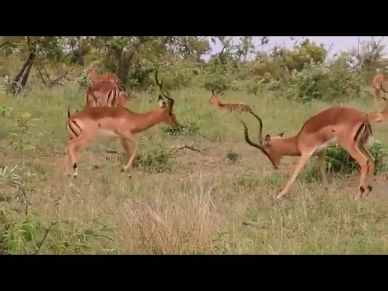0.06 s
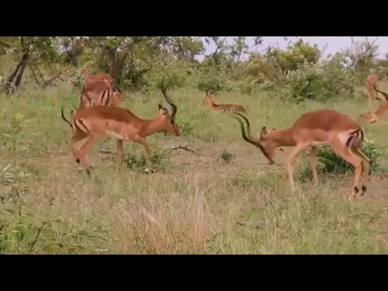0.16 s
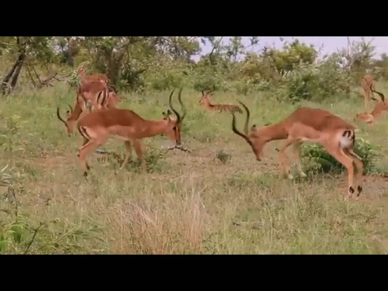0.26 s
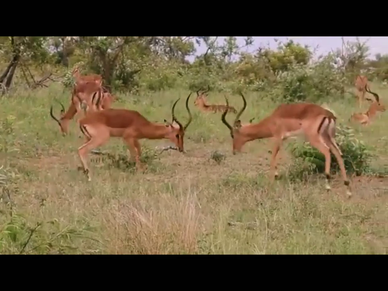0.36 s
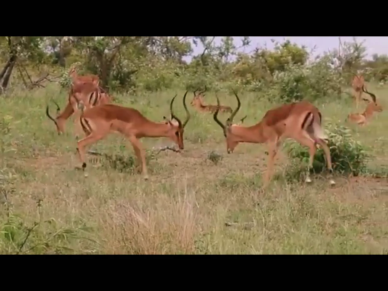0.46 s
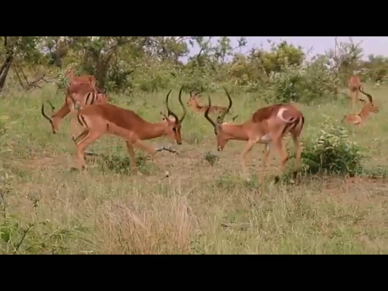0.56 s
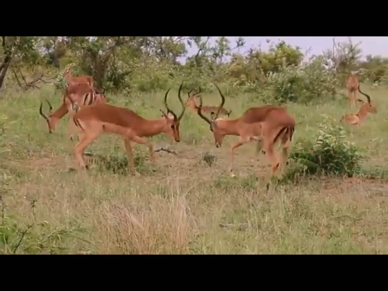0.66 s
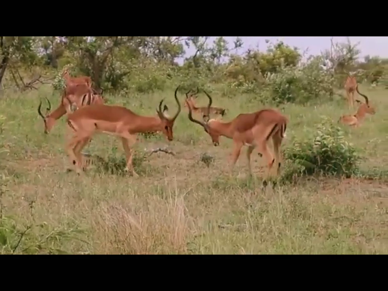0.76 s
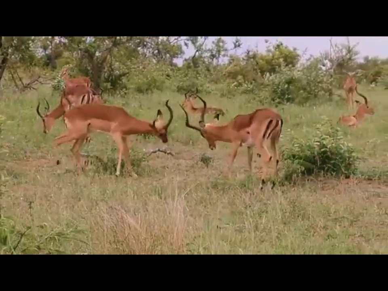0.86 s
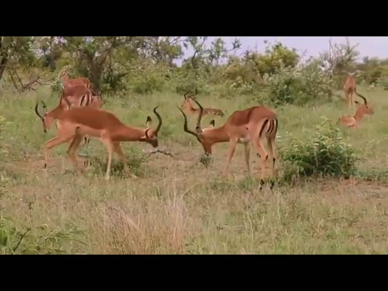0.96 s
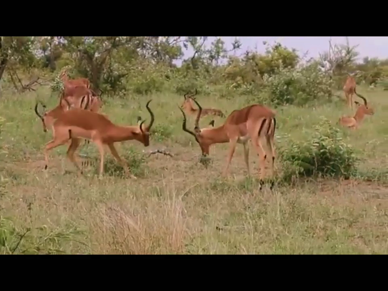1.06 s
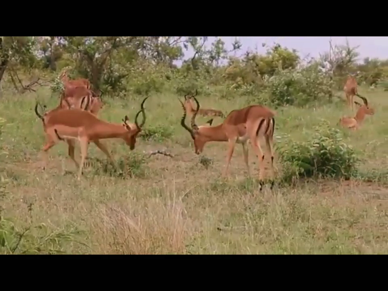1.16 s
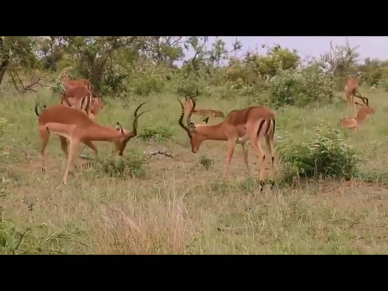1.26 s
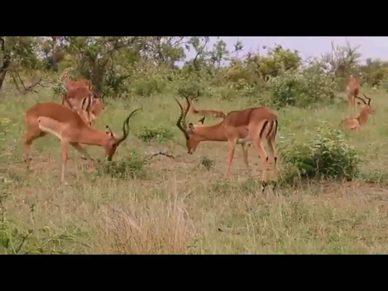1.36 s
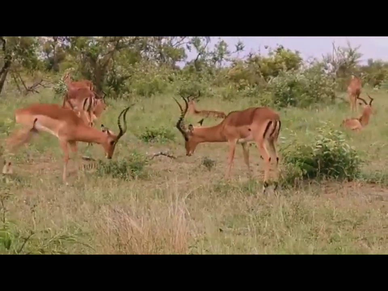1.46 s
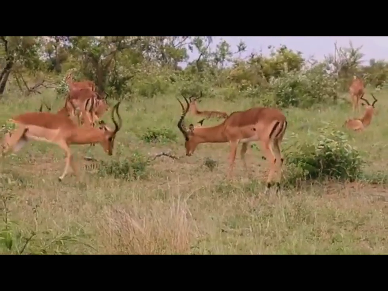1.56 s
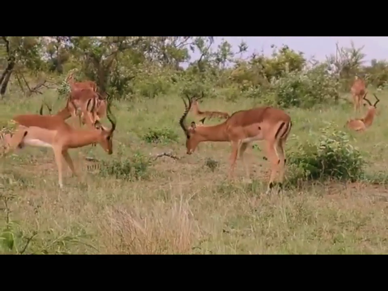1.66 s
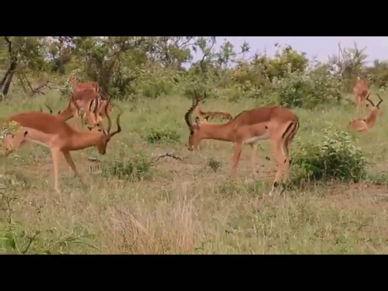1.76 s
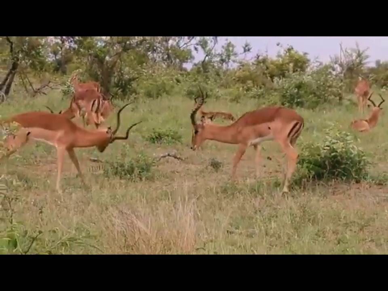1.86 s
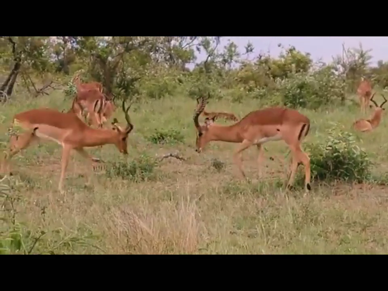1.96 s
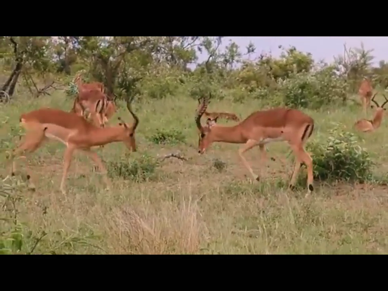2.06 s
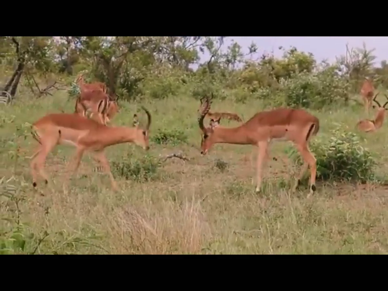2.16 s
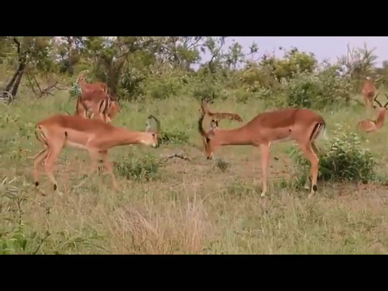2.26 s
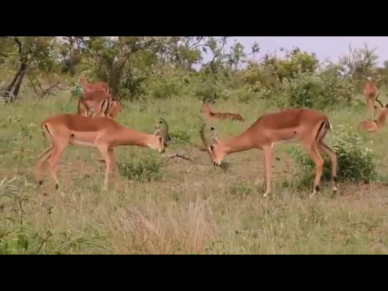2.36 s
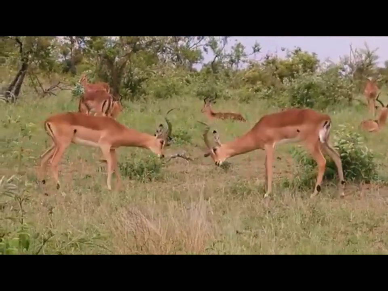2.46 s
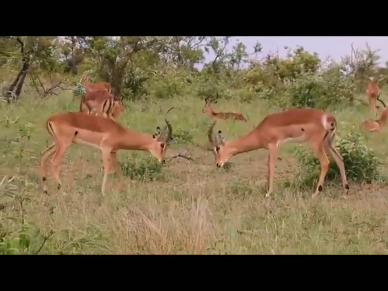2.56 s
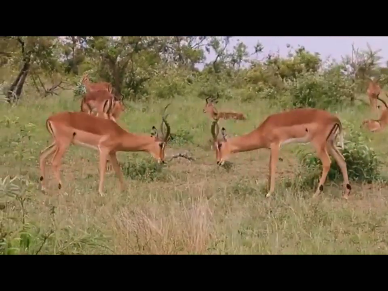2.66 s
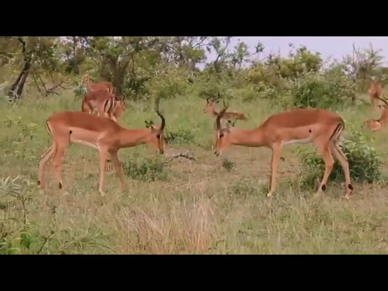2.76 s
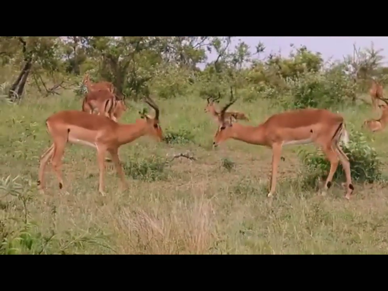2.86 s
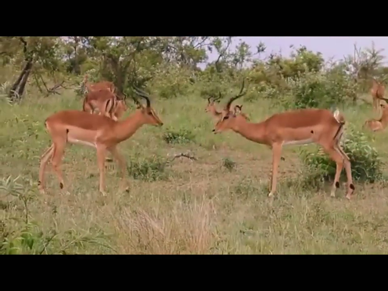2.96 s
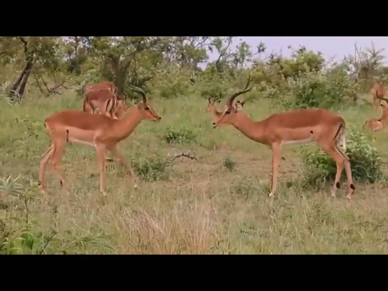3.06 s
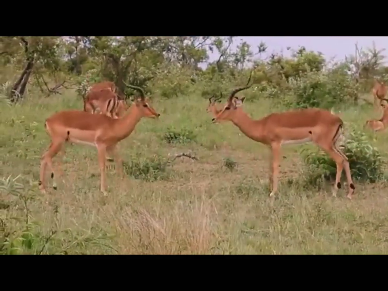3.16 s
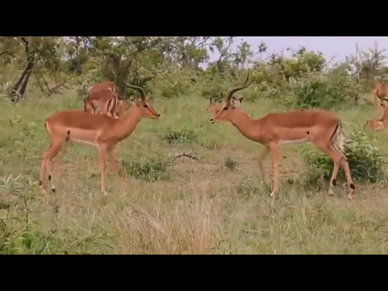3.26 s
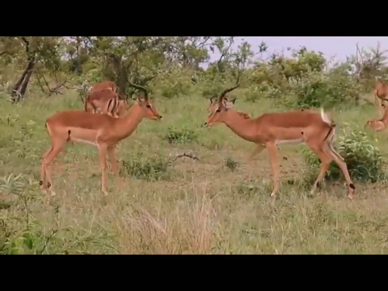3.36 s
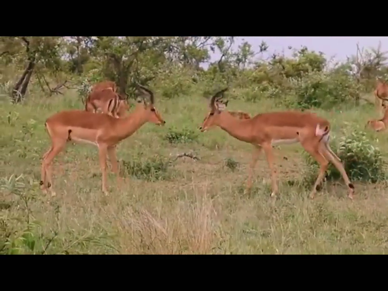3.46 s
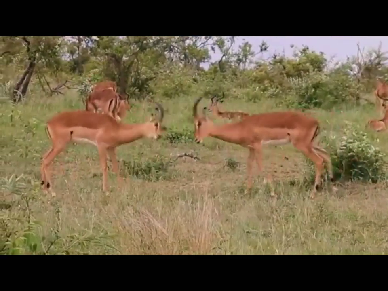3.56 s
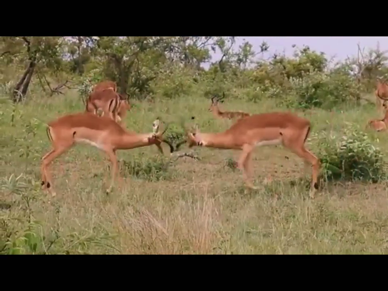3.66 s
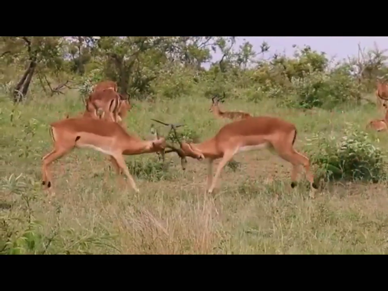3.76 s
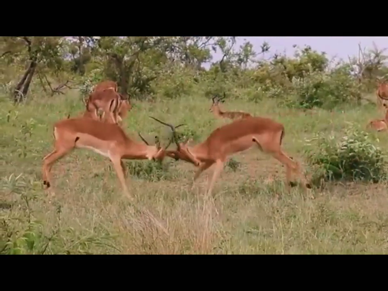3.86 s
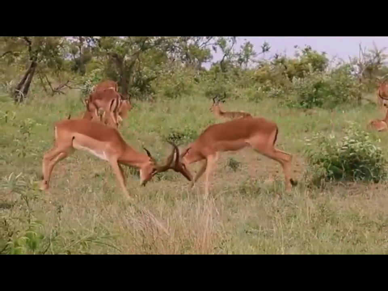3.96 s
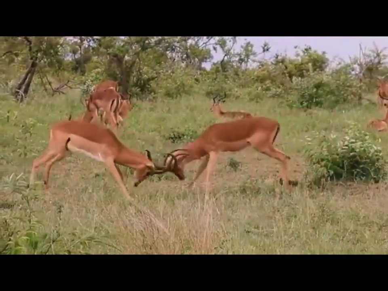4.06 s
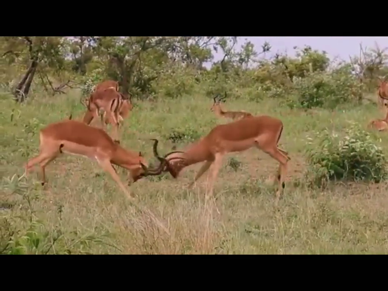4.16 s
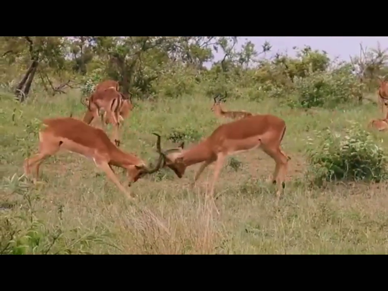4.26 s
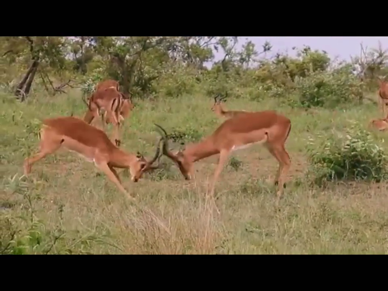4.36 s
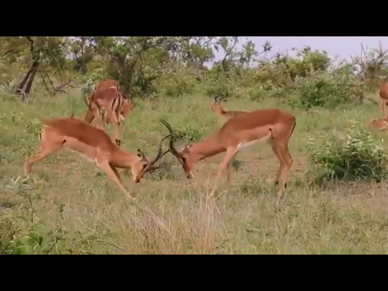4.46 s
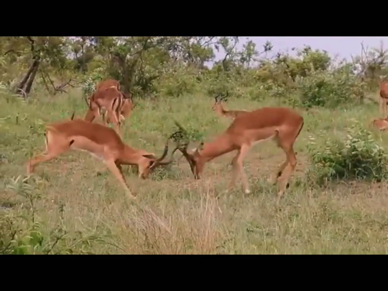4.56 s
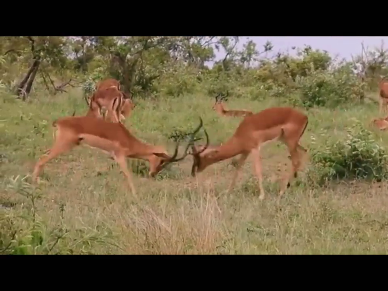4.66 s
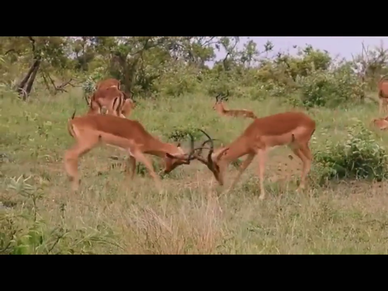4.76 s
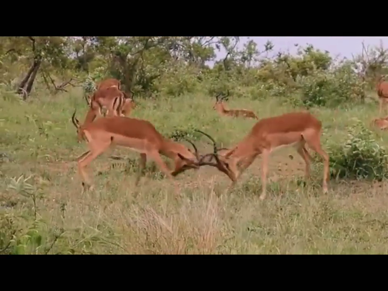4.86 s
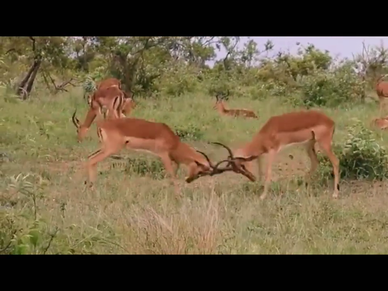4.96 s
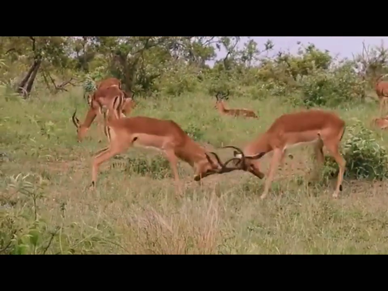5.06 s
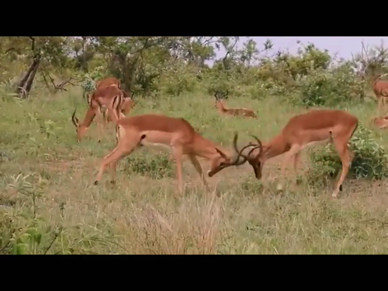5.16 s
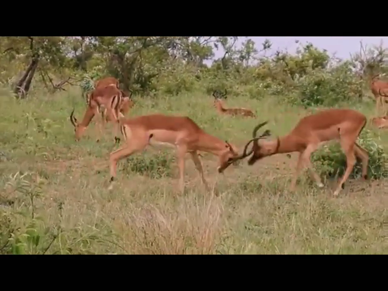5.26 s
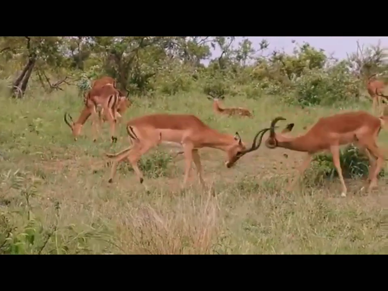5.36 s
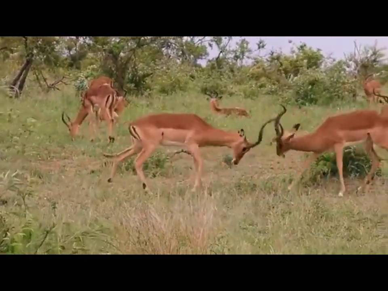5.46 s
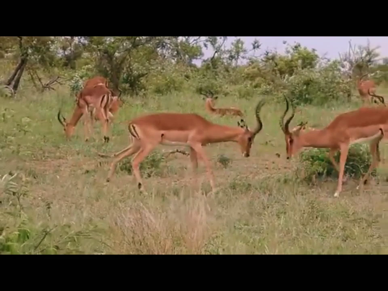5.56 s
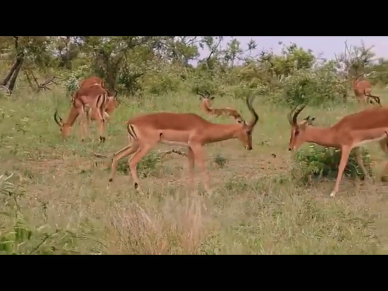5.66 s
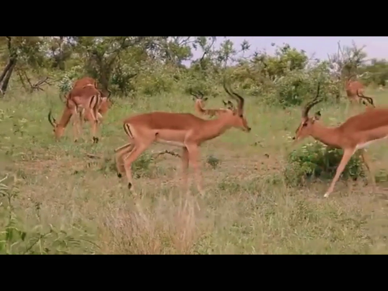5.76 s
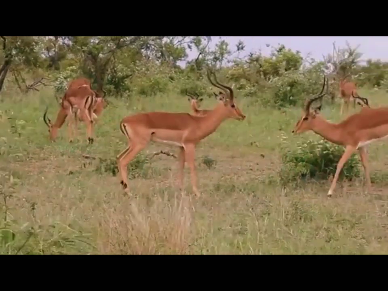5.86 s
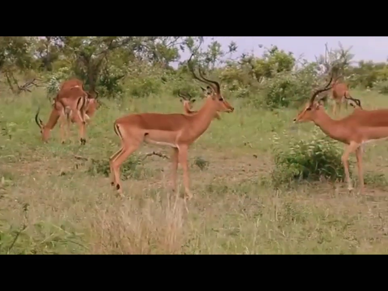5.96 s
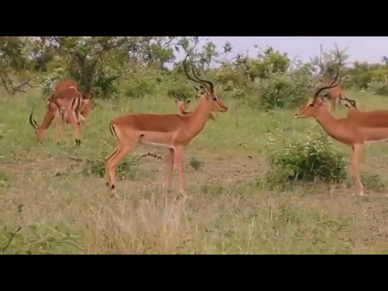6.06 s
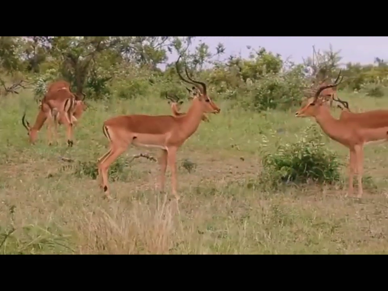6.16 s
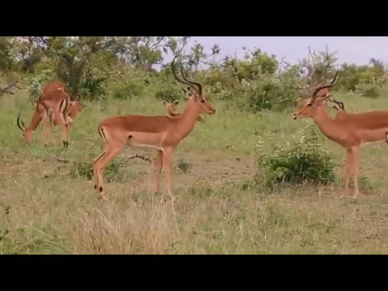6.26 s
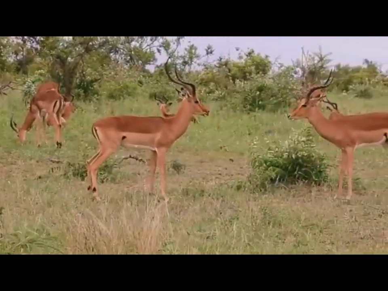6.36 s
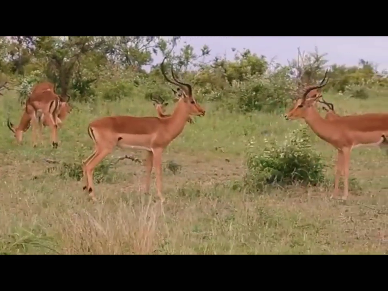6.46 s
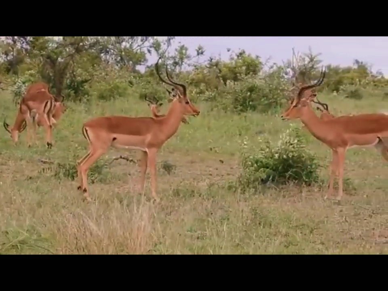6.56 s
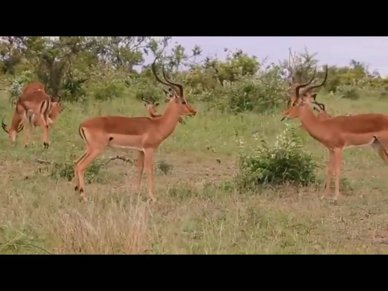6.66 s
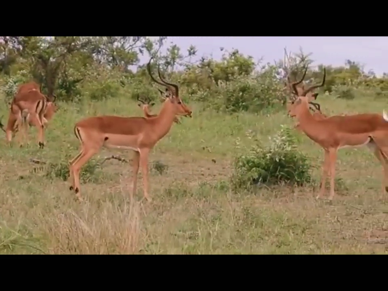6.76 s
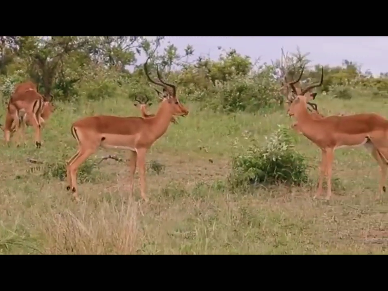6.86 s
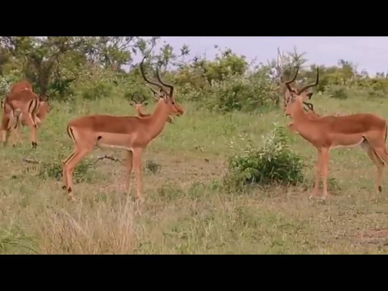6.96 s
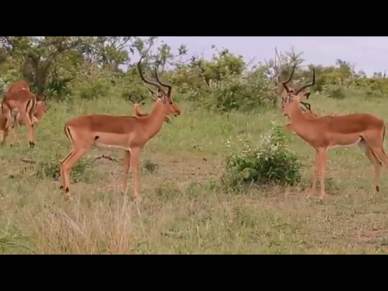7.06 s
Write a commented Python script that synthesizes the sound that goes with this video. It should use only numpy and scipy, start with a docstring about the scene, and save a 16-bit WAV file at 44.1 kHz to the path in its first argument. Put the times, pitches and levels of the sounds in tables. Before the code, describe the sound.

A thin, steady hiss of grass and leaves fills open bush, with small birds whistling and rasping faintly, mostly to the right. Straight ahead, two antelopes scuff dry grass and tap horns once. Midway their horns clash in a quick, loud volley of dry clacks. Lighter knocks, ratchety rubs and soft hoof scuffs follow, then only faint whistles and a couple of stalk snaps remain.

```python
"""Open bush: a thin hiss of distant grass and leaves runs throughout, with faint far birds calling.
Two sparring antelopes scuff the dry grass and touch horns once; small birds rasp and whistle, mostly
to the right. Midway the ridged horns clack in a quick volley, each blow ringing briefly and rebounding.
Soft hoof falls follow, the horns rub and knock more lightly, and the last whistles and stalk snaps
close the scene."""
import sys
import numpy as np
from scipy import signal
from scipy.fft import rfft, irfft, next_fast_len
from scipy.io import wavfile

SR = 44100
rng = np.random.default_rng(int(sys.argv[2]) if len(sys.argv) > 2 else 0)


def to_wav(sig):
    """Store sig (one row per channel, or 1-D mono) as 16-bit WAV at the path in sys.argv[1].

    Samples outside -1..1 are clipped; the rate is SR.
    """
    pcm = np.clip(np.atleast_2d(sig), -1, 1) * 32767
    pcm = np.round(pcm).astype(np.int16)
    wavfile.write(sys.argv[1], SR, pcm.T)  # frames by channels


N = 314124


def from_db(db):
    """Decibels to gain."""
    return 10 ** (np.asarray(db) / 20)


def unit_rms(x):
    """Scale to unit rms."""
    return x / np.sqrt(np.mean(x ** 2) + 1e-20)


def butter(x, hz, kind, order=2):
    """Causal Butterworth filter."""
    sos = signal.butter(order, np.clip(hz, 10, .45 * SR), kind, fs=SR, output="sos")
    return signal.sosfilt(sos, x + 1e-18)


def bell_eq(x, hz, width_hz, db):
    """A ringing resonance that stands db above its surroundings, or a dip if db is negative."""
    pole = np.pi * width_hz / SR
    zero = pole * from_db(db)
    tuning = -2 * np.cos(2 * np.pi * hz / SR)
    return signal.lfilter([1 + zero, tuning, 1 - zero], [1 + pole, tuning, 1 - pole], x)


def seconds(length_s):
    """Time axis of a short sound."""
    return np.arange(max(int(length_s * SR), 8)) / SR


def swell(t):
    """A rounded rise and fall over the time axis t."""
    return np.sin(np.pi * t / (t[-1] + 1 / SR))


def decay(t, t60_s):
    """An envelope that falls 60 dB in t60_s."""
    return from_db(-60 * t / t60_s)


def wander(rate_hz, size):
    """Random drift: straight lines between values of spread 1."""
    return np.interp(np.arange(size) * rate_hz / SR, np.arange(4000), rng.standard_normal(4000))


def curve_at(points, hz):
    """Read a curve on a log-frequency axis."""
    point_hz, values = np.array(points).T
    return np.interp(np.log(hz + 1), np.log(point_hz), values)


def stereo_noise(correlation, size):
    """Left and right white noise with one correlation, or one per frequency."""
    mid, side = rfft(rng.standard_normal((2, size)))
    return irfft(np.sqrt(1 + correlation) * mid + np.sqrt(1 - correlation) * side * [[1], [-1]], size)


def add(out, start_s, sound):
    """Mix a sound in at start_s."""
    at = int(round(start_s * SR))
    out[at:at + len(sound)] += sound[:N - at]


def add_panned(out, start_s, sound, pan_db, ear_lag_s=.0002):
    """Pan is left minus right: a sound on the right reaches the left ear later and weaker."""
    add(out[0], start_s - ear_lag_s * np.tanh(pan_db / 2), sound * from_db(pan_db / 2))
    add(out[1], start_s, sound * from_db(-pan_db / 2))


# Tone of the hiss bed: frequency_hz, relative_level_db
HISS_TONE = [(120, -46), (200, -45), (554, -29), (858, -12), (1210, -4), (1330, -2.5), (1540, -1),
             (1650, -0.5), (2210, -2), (2470, -1.5), (2700, -1), (3360, -3), (6830, -11), (12900, -18),
             (15500, -22)]
# Stereo image of the bed: frequency_hz, left_right_correlation
HISS_IMAGE = [(100, 0.97), (300, 0.59), (640, 0.41), (1410, -0.29), (3100, -0.22), (6820, 0.15),
              (15000, 0.079)]


def hiss(level_db=-52.5, sway_db=1.13, sway_hz=4.6):
    """Distant grass and leaves make a wide, even hiss that sways slightly."""
    size = next_fast_len(N)
    hz = np.arange(size // 2 + 1) * SR / size
    white = stereo_noise(curve_at(HISS_IMAGE, hz), size)
    bed = irfft(rfft(white) * from_db(curve_at(HISS_TONE, hz)), size)[:, :N]
    return unit_rms(butter(bed, 230, "high")) * from_db(level_db + sway_db * wander(sway_hz, N))


def far_bird_notes(count=10, length_s=.065, pitch_hz=2770, spread_oct=.17, glide_oct=-.13,
                   relative_db=-56.5):
    """Far birds call faint falling notes at random moments and pitches: rows for whistles() to play."""
    starts = (np.arange(count) + rng.random(count)) / count * (N / SR - length_s)
    pitches = pitch_hz * 2 ** (spread_oct * rng.standard_normal(count))
    return [(start_s, length_s, hz, hz * 2 ** glide_oct, relative_db)
            for start_s, hz in zip(starts, pitches)]


# Hooves brushing dry grass: start_s, length_s, level_db
GRASS_SCUFFS = [(0.489, 0.046, -56.5), (.785, 0.035, -54), (1.559, 0.088, -56), (3.9, .11, -51.5),
                (4.198, 0.18, -51.5), (4.432, 0.086, -47.5), (4.809, 0.13, -49), (4.919, 0.28, -57.5),
                (5.483, 0.13, -57.5), (5.603, 0.4, -60.5)]
# Crisp single stalk snaps: start_s, level_db, pitch_hz
STALK_SNAPS = [(0.518, -38, 4000), (1.638, -41, 7600), (6.15, -40, 7240), (6.8496, -30, 8300)]


def grass(cracks_per_s=1800, spread_db=5.5, band_hz=(1200, 4300), snap_t60_s=.003):
    """Scuffs are showers of tiny stalk cracks; now and then one stalk snaps alone."""
    out = np.zeros(N)
    for start_s, length_s, level_db in GRASS_SCUFFS:
        t = seconds(length_s)
        cracks = (rng.random(len(t)) < cracks_per_s / SR) * rng.choice([-1, 1], len(t))
        strength = from_db(spread_db * np.minimum(rng.exponential(1, len(t)), 3))
        crunch = unit_rms(butter(cracks * strength, band_hz, "band"))
        add(out, start_s, from_db(level_db) * swell(t) * crunch)
    t = seconds(.01)
    for start_s, level_db, pitch_hz in STALK_SNAPS:
        snap = np.sin(2 * np.pi * pitch_hz * t) * decay(t, snap_t60_s)
        add(out, start_s, from_db(level_db) * butter(snap, pitch_hz / 2, "high"))
    return butter(out, 800, "high", order=3)


# Horn hits, brighter towards the hard tips; each rings the spot it strikes:
# start_s, peak_db, spot_pitch_hz, spot_boost_db, high_cut_hz
HORN_BLOWS = [(0.6357, -27, 3870, 8.5, 4700), (3.7908, -15, 4200, 10, 4700), (3.7935, -5.5, 4330, 11, 4670),
              (3.8213, -4, 2650, 5, 5400), (3.8454, -5.5, 3870, 3, 4860), (3.8511, -9.5, 4400, 4, 4730),
              (3.856, -7.5, 3950, 12.5, 4520), (3.8567, -5, 2310, 13.5, 4650), (3.8666, -15, 2200, 7, 4400),
              (3.9292, -26, 1990, 8, 4070), (3.9552, -32, 1780, 11, 5200), (4.2757, -32, 3050, 4, 4300),
              (4.4784, -26, 3330, 3, 4060), (4.5548, -31.5, 1720, 6.5, 4340),
              (4.8606, -23.5, 2510, 19, 5000), (4.868, -19, 3620, 9, 4000), (4.8754, -16.5, 4450, 9, 5640),
              (4.8763, -18.5, 1380, 11, 3680), (5.4061, -18, 2960, 14, 4370), (5.5082, -32, 4380, 6, 4400),
              (5.5841, -27.5, 3520, 5, 4670), (5.5895, -13.5, 3330, 19.5, 7100)]


def blows_and_rebounds(gap_s=.0048, drop_db=14.5, further_drop_db=3.5, dulling=.83, glance_boost_db=-1):
    """Contacts for horns(): each blow bounces twice, weaker, duller and too glancing to ring the spot."""
    contacts = list(HORN_BLOWS)
    for start_s, peak_db, spot_hz, _, high_cut_hz in HORN_BLOWS:
        delays = gap_s * np.cumsum(rng.uniform(.7, 1.3, 2))
        for bounce, delay_s in enumerate(delays):
            bounce_db = peak_db - drop_db - further_drop_db * bounce
            contacts.append((start_s + delay_s, bounce_db, spot_hz, glance_boost_db, high_cut_hz * dulling))
    return contacts


# Body resonances of a horn: pitch_hz, width_hz, boost_db
HORN_MODES = [(1076, 97, 8), (1830, 87, 5.5), (2336, 200, 4), (2590, 80, 1), (3350, 140, -2),
              (3970, 184, 4), (4450, 200, 3.5), (5340, 180, 3.5), (6730, 740, 2)]


def horns(contacts, smear_db=-13, smear_t60_s=.0058, crack_db=-32, low_trace_db=-49, low_cut_ratio=.38,
          detune=.017, vary_db=1.5, spot_width_hz=520):
    """Each contact is a slightly smeared click, coloured by the damped horn modes and the struck spot."""
    out, t = np.zeros((2, N)), seconds(.025)
    # a millisecond or two of close scattered reflections after each click, slightly different in each ear
    smear_envelope = decay(t, smear_t60_s) * np.minimum(t / .0006, 1) ** 2
    for start_s, peak_db, spot_hz, spot_boost_db, high_cut_hz in contacts:
        smear = from_db(smear_db) * smear_envelope * stereo_noise(correlation=.45, size=len(t))
        click = signal.unit_impulse(len(t)) + smear
        # the contact time limits the treble; a tiny crack passes above it
        clack = butter(click, high_cut_hz, "low", order=6) + from_db(crack_db) * click
        clack = butter(clack, low_cut_ratio * high_cut_hz, "high", order=3)
        # a very faint low-frequency trace lies under each clack
        clack = butter(clack, 1050, "high") + from_db(low_trace_db) * butter(click, 400, "low")
        # every blow meets the modes at a different point along the horn
        for pitch_hz, width_hz, boost_db in HORN_MODES:
            mode_hz = pitch_hz * (1 + detune * rng.normal())
            clack = bell_eq(clack, mode_hz, width_hz, boost_db + vary_db * rng.normal())
        clack = bell_eq(clack, spot_hz, spot_width_hz, spot_boost_db)
        for ear in range(2):
            add(out[ear], start_s, from_db(peak_db) * clack[ear] / np.abs(clack).max())
    return out


# Raspy bird calls: start_s, length_s, start_pitch_hz, end_pitch_hz, width_hz, relative_level_db, pan_db
BIRD_RASPS = [(1.037, 0.16, 3690, 3880, 1660, -47, -9.5), (1.205, .022, 5400, 4360, 706, -50.5, -4),
              (1.488, .1, 3900, 3490, 605, -50.5, -9), (4.962, 0.2, 5260, 6250, 600, -53, 0.5)]


def rasps(flutter_db=1, flutter_hz=140):
    """A bird's rasp is a gliding tone shaken into a band of noise."""
    out = np.zeros((2, N))
    for start_s, length_s, start_hz, end_hz, width_hz, level_db, pan_db in BIRD_RASPS:
        t = seconds(length_s)
        shake = butter(rng.standard_normal((2, len(t))), width_hz / 2, "low")
        phase = 2 * np.pi * np.cumsum(np.linspace(start_hz, end_hz, len(t))) / SR
        band = unit_rms(shake[0] * np.cos(phase) + shake[1] * np.sin(phase))
        envelope = swell(t) * from_db(level_db + flutter_db * wander(flutter_hz, len(t)))
        add_panned(out, start_s, band * envelope, pan_db)
    return out


# The nearer bird's clear notes: start_s, length_s, start_pitch_hz, end_pitch_hz, relative_level_db
NEAR_WHISTLES = [(1.579, 0.072, 3350, 3383, -43.5), (1.904, 0.042, 2380, 2280, -43.5),
                 (2.01, .11, 3167, 3100, -55), (2.306, .045, 2390, 2444, -48),
                 (2.436, 0.11, 3080, 3050, -50), (2.445, 0.087, 4120, 4090, -63),
                 (2.849, .04, 2740, 2130, -44.5), (3.621, .073, 2374, 2320, -46),
                 (3.738, .035, 2900, 3150, -46), (3.765, .025, 3410, 2450, -46),
                 (4.376, 0.045, 3520, 3190, -49), (4.59, 0.062, 3470, 3290, -53.5),
                 (5.635, 0.17, 2736, 2805, -47.5), (6.696, .092, 3930, 3610, -54.5),
                 (6.776, 0.043, 3240, 2850, -49.5), (6.843, 0.11, 3520, 3240, -53)]


def whistles(far_notes, arch=.014, waver=.013, flutter_db=3, pan_db=-7.5):
    """Near and far birds whistle wavering sines whose pitch glides along a slight arch."""
    out = np.zeros((2, N))
    for start_s, length_s, start_hz, end_hz, level_db in NEAR_WHISTLES + far_notes:
        t = seconds(length_s)
        bend = 1 + arch * swell(t) + waver * wander(rate_hz=120, size=len(t))
        pitch_hz = np.linspace(start_hz, end_hz, len(t)) * bend
        level = from_db(level_db + flutter_db * wander(rate_hz=70, size=len(t)))
        tone = np.sin(2 * np.pi * np.cumsum(pitch_hz) / SR)
        add_panned(out, start_s, level * np.sqrt(2 * swell(t)) * tone, pan_db)
    return out


# Ratchety rubs of locked horns: start_s, length_s, tick_peak_db
HORN_SLIDES = [(3.8386, .012, -17.5), (3.875, .013, -25), (3.911, .055, -39.5), (4.46, 0.069, -33),
               (4.881, .025, -26.5), (5.526, .03, -37.5), (5.599, 0.015, -37)]


def ridge_ticks(gap_s=.0055, spread_db=3.5, fade_db=-5, pitch_hz=3100, spread_oct=.35, boost_db=9.5,
                high_cut_hz=4240):
    """Contacts for horns(): locked horns slide, ridge ticking unevenly over ridge and fading."""
    contacts = []
    for start_s, length_s, peak_db in HORN_SLIDES:
        for ridge, (jitter, strength, spot) in enumerate(rng.standard_normal((16, 3))):
            delay_s = gap_s * (ridge + .28 * jitter)
            if delay_s < length_s:
                tick_db = peak_db + spread_db * strength + fade_db * delay_s / length_s
                spot_hz = pitch_hz * 2 ** (spread_oct * spot)
                contacts.append((start_s + delay_s, tick_db, spot_hz, boost_db, high_cut_hz))
    return contacts


# Soft, muffled steps: start_s, relative_peak_db
HOOF_FALLS = [(4.23, -60), (4.291, -69), (4.348, -62.5), (4.495, -64)]


def hooves(gain_db=-8, band_hz=(270, 520), t60_s=.084):
    """A hoof presses a short dull puff out of the soil."""
    out, t = np.zeros(N), seconds(.08)
    for start_s, peak_db in HOOF_FALLS:
        puff = butter(rng.standard_normal(len(t)) * decay(t, t60_s), band_hz, "band")
        add(out, start_s, from_db(peak_db + gain_db) * puff / np.abs(puff).max())
    return out


def reflections(x, t60_s, gain_db, correlation, high_cut_hz, delay_s):
    """Many small reflections off ground and leaves: a dull, dying tail in each ear."""
    t = seconds(t60_s)
    tail = butter(stereo_noise(correlation, len(t)), high_cut_hz, "low") * decay(t, t60_s)
    energy = np.mean(np.sum(tail ** 2, axis=1))
    tail *= from_db(gain_db) * np.sqrt(2 * high_cut_hz / SR / energy)
    delayed = np.pad(tail, ((0, 0), (int(delay_s * SR), 0)))
    return signal.fftconvolve(x[None], delayed, axes=1)[:, :N]


def scene(bird_gain_db=-3):
    """The fight is straight ahead on open ground; the birds sit among the trees."""
    fight = horns(blows_and_rebounds() + ridge_ticks()) + grass() + hooves()
    mono = fight.mean(axis=0)
    ground = reflections(mono, t60_s=.021, gain_db=-9.5, correlation=.55, high_cut_hz=4730, delay_s=.001984)
    bushes = reflections(mono, t60_s=.46, gain_db=-19.5, correlation=.22, high_cut_hz=4000, delay_s=.013)
    left, right = fight + ground + bushes
    # the knocks are a little thinner in the left ear and a little duller in the right
    left = bell_eq(left, hz=1300, width_hz=1200, db=-3)
    right = bell_eq(right, hz=4300, width_hz=1500, db=-1)
    birds = from_db(bird_gain_db) * butter(whistles(far_bird_notes()) + rasps(), 1200, "high")
    trees = reflections(birds[1], t60_s=.13, gain_db=-11.5, correlation=0, high_cut_hz=6000, delay_s=.01)
    return np.array([left, right]) + birds + trees + hiss()


def record(dry, high_cut_hz=15850):
    """A steep high cut takes off the very top."""
    return signal.sosfilt(signal.ellip(12, .1, 70, high_cut_hz, fs=SR, output="sos"), dry)


dry = scene()
out = record(dry)
to_wav(out)
```